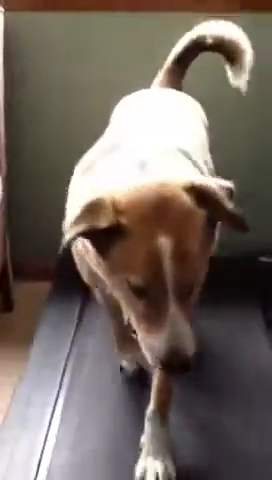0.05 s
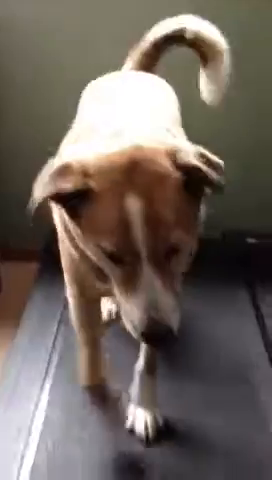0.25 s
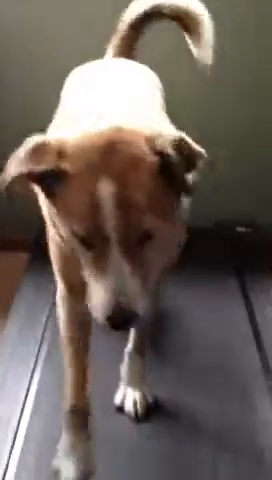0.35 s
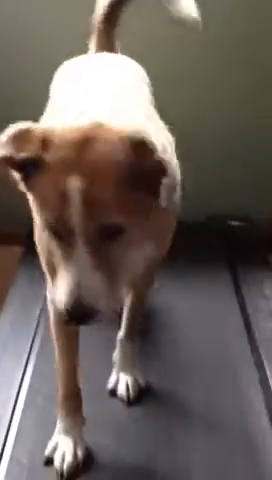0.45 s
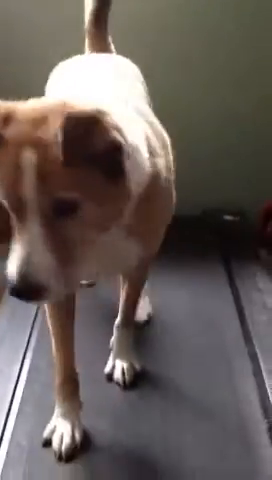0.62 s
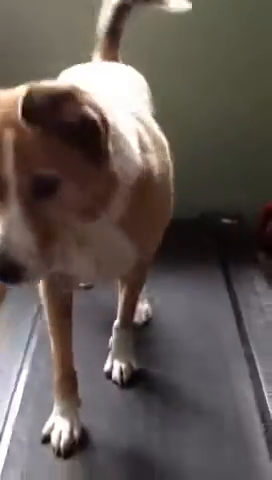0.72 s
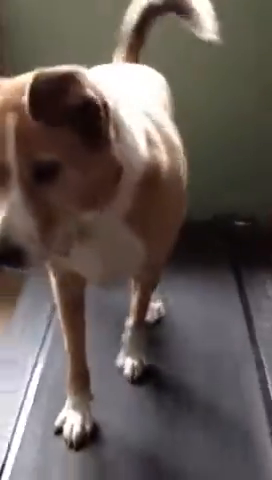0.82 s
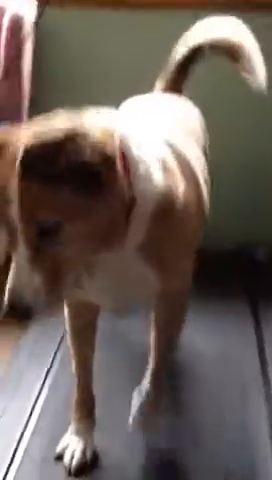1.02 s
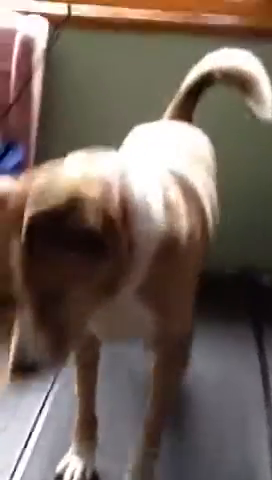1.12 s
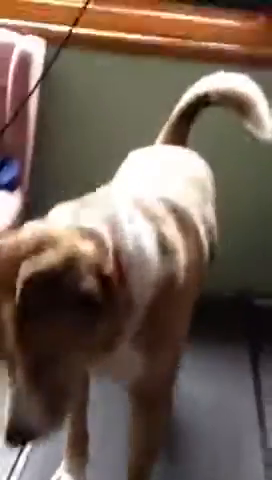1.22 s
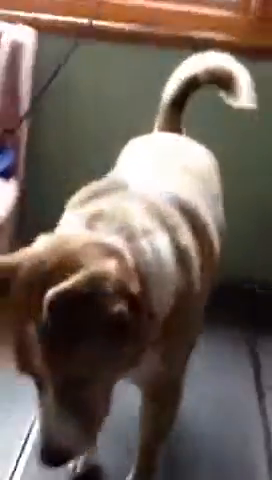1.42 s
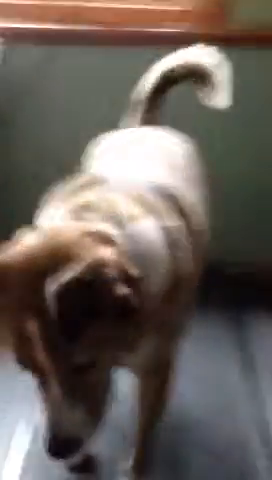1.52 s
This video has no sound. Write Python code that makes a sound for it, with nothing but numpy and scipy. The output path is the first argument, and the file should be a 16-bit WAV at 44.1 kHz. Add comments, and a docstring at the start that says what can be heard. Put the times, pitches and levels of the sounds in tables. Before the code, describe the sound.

A sharp clack with a short metallic ring stands out early as a dog walks on a treadmill, close to the microphone indoors. Faint claw ticks, paw thuds and belt taps come before and after, over low rumble.

```python
"""One hard knock thumps the deck of a slow treadmill and sets its metal frame ringing.
A dog is walking on it, close to the microphone in a small room: its claws tick and its
soft pads thud, among dull taps of belt and deck. The belt swishes over the deck with
the stride, above a low rumble and a faint hiss."""
import sys
import numpy as np
from scipy import signal
from scipy.fft import rfft, irfft
from scipy.io import wavfile

SR = 44100
rng = np.random.default_rng(int(sys.argv[2]) if len(sys.argv) > 2 else 0)


def master(y):
    """Save y as 16-bit WAV."""
    cut = np.clip(np.atleast_2d(y).T, -1, 1)
    pcm = np.round(cut * 32767)  # scale
    wavfile.write(sys.argv[1], SR, pcm.astype(np.int16))


N = 68355

# A t60 is the time a sound takes to fade by 60 dB. A colour says how strong each frequency is.
# Colour of the knock's bright crash: frequency_hz, level_db
CRASH_COLOUR = [(800, -21.5), (1700, -7), (3000, -4), (4600, -2.5), (6000, -6), (9000, -14), (15000, -21)]
# Low notes of the struck deck: pitch_hz, level_db, t60_s
DECK_NOTES = [(150, -11.5, .04), (203, 0, .035), (279, -1.5, 0.021), (373, -1, .028), (535, -0.5, 0.013),
              (864, -7, .025)]
# Ringing notes of the metal frame: pitch_hz, level_db, t60_s
FRAME_NOTES = [(1424, -49, 1.1), (1464, -30, .25), (1590, -24, .14), (1676, -27, .21), (1900, -30, .29),
               (2186, -28, .25), (2380, -24, .13), (2472, -20, .2), (2564, -20, .19), (2612, -29, .38),
               (3282, -26, .25), (3465, -15, .11), (3745, -25, .23), (4495, -27, .21), (5760, -28, .22),
               (5959, -27, .22), (6600, -30, .24), (6891, -27, .22), (7052, -26, .2), (7210, -30, .27),
               (7790, -34, .25)]
# Colour and fade of the dense ring of frame and room: frequency_hz, level_db, t60_s
CLATTER_BANDS = [(60, -39, .12), (168, -18, .23), (600, -24.5, 0.18), (1220, -24.5, 0.27), (1540, -6, .2),
                 (2600, -2, 0.19), (3030, -7.5, .2), (3500, -2, 0.16), (4420, -5.5, 0.24), (5100, -9, .22),
                 (6900, -0.5, 0.23), (8500, -8.5, 0.21), (10000, -15.5, 0.17), (14800, -19, .14),
                 (16000, -30, .1)]
# Claw ticks: start_s, level_db, tail_level_db, brightness_db_per_octave
CLAW_TICKS = [(0.0476, -31.5, -54, -2.5), (.057, -42, -62, -10.5), (0.081, -33.5, -59, -3),
              (.0938, -41, -64, -3.5), (0.1428, -29, -54.5, 3), (.859, -51, -66.5, 5),
              (0.8806, -41, -60.5, -1), (0.932, -33, -49.5, -.5), (0.9392, -48, -60, -8.5)]
# Colour of a claw tick: frequency_hz, level_db
TICK_COLOUR = [(60, -49.5), (180, -17.5), (900, -12), (1500, -2), (4400, -1), (5400, -5), (8300, -6),
               (10000, -27), (15000, -23.5)]
# Soft paws landing on the deck: start_s, level_db, pitch_hz
PAD_FALLS = [(0.024, -49, 175.5), (0.069, -48, 171), (.092, -46.5, 195), (0.148, -48.5, 145),
             (0.187, -63, 149), (0.384, -50, 174), (0.424, -51.5, 167.5), (.505, -60, 165),
             (.641, -52, 165), (.940, -55, 208), (.967, -57, 174), (1.008, -64, 160), (1.192, -43, 194.4),
             (1.218, -43, 190), (1.271, -43.5, 283), (1.392, -76.5, 201.7), (1.510, -51, 198.6),
             (1.541, -51, 242)]
# Dull taps of belt and deck: start_s, level_db, centre_hz, t60_s
DULL_TAPS = [(0.061, -54, 1650, 0.11), (0.669, -59, 1220, .09), (.9148, -52.5, 1480, 0.1),
             (1.050, -58, 1480, .1), (1.263, -55, 1270, 0.056), (1.328, -42, 850, 0.023),
             (1.339, -49, 930, 0.064), (1.387, -60, 1270, 0.19), (1.499, -57, 1414, 0.14),
             (1.520, -65, 880, .2)]
# Loudness of the belt's swish: time_s, level_db
SWISH_LEVELS = [(0, -55), (.11, -58.5), (.22, -60), (.40, -56), (.55, -66), (.60, -56), (.70, -61),
                (.77, -65), (.83, -73.5), (.89, -74.5), (1.03, -72), (1.11, -68.5), (1.21, -56),
                (1.25, -59), (1.32, -64), (1.46, -59.5), (1.49, -71.5), (1.55, -52.5)]
# Colour of the swish: frequency_hz, level_db
SWISH_COLOUR = [(200, -9), (600, -14.5), (1400, -2), (2700, 1.5), (3400, -1.5), (4500, 3), (5400, -1.5),
                (7400, 1.5), (8600, -5.5), (9800, -16.5), (13500, -10), (15000, -13.5), (16000, -33.5)]
# Loudness of the deck's rumble: time_s, level_db
RUMBLE_LEVELS = [(0, -63.5), (.2, -62), (.35, -68.5), (.5, -70), (.68, -68), (.82, -73), (.9, -73.5),
                 (.96, -65.5), (1.04, -68), (1.15, -69.5), (1.22, -64.5), (1.36, -60.5), (1.46, -62.5),
                 (1.55, -58)]
# Colour of the rumble: frequency_hz, level_db
DECK_COLOUR = [(30, -30.5), (85, -29), (125, -6), (170, 1), (300, -2), (550, -10), (1200, -12.5),
               (3000, -24), (9000, -42)]

KNOCK_S, EARLIER_KNOCK_S = 0.244, -0.26  # the earlier knock comes before the scene opens
DECK_LOW_HZ = 110  # thumps and thuds are thinned below this


def knock():
    """A hard contact crashes, thumps the deck and leaves the frame ringing."""
    crash = undb(-16) * noise(colour(CRASH_COLOUR)) * fade(KNOCK_S, 0.00067, t60_s=0.062, hold_s=0.011)
    deck = ring(DECK_NOTES, KNOCK_S + 0.002, rise_s=0.000074)
    thump = undb(-20.5) * highpass(deck, DECK_LOW_HZ)
    frame = ring(FRAME_NOTES, KNOCK_S, rise_s=0.0011)
    return crash + squeak() + thump + frame + clatter() + overtones()


def squeak():
    """A brief note of the contact sinks as the parts press together."""
    start_hz, end_hz, sink_s = 4800, 3247, 0.0054
    pitch_hz = end_hz + (start_hz - end_hz) * np.exp(-(since(KNOCK_S) / sink_s) ** 2)
    tone = np.sin(2 * np.pi * np.cumsum(pitch_hz) / SR)
    return undb(-12) * tone * fade(KNOCK_S, 0.0001, t60_s=0.039, hold_s=0.0064)


def clatter():
    """Countless close notes of frame and room blur into noise; each band fades at its own pace."""
    band_hz, _, t60s = np.array(CLATTER_BANDS).T
    spectrum = rfft(noise(colour(CLATTER_BANDS)))
    out = 0
    for this_band, t60_s in zip(np.eye(len(band_hz)), t60s):
        share = np.interp(octaves(), np.log2(band_hz), this_band)  # 1 here, 0 at the next band
        out += irfft(spectrum * share, N) * fade(KNOCK_S, 0.0015, t60_s)
    return undb(-16.5) * out


def overtones(count=70):
    """Weak high notes of the frame follow the clatter's colour; the higher ones die sooner."""
    low_hz, high_hz, scatter_db = 3325, 12530, 3
    place, strength = rng.random((count, 2)).T
    pitch_hz = low_hz * (high_hz / low_hz) ** ((np.arange(count) + place) / count)
    band_hz, band_db, _ = np.array(CLATTER_BANDS).T
    level_db = -31 + np.interp(pitch_hz, band_hz, band_db) + scatter_db * (2 * strength - 1)
    t60_s = 0.29 * (low_hz / pitch_hz) ** 0.45
    return ring(zip(pitch_hz, level_db, t60_s), KNOCK_S, rise_s=0.005)


def claws():
    """Each claw gives a sharp tick, a tiny scratch and a short tail from deck and room."""
    out = 0
    for start_s, level_db, tail_db, brightness in CLAW_TICKS:
        gain = colour(TICK_COLOUR, brightness)
        scratch = undb(level_db - 10.5) * fade(start_s, 0.0001, t60_s=0.0092)
        tail = undb(tail_db) * fade(start_s, 0.0011, t60_s=0.17)
        out += undb(level_db) * click(gain, start_s) + (scratch + tail) * noise(gain)
    return out


def pads():
    """Soft paws push the deck into a low ring that lingers in the room."""
    out = 0
    for start_s, level_db, pitch_hz in PAD_FALLS:
        thud = ring([(pitch_hz, level_db, 0.07)], start_s, rise_s=0.002)
        room = noise(hump(pitch_hz, width_octaves=0.86) * colour(DECK_COLOUR) ** 0.5)
        out += thud + undb(level_db - 10.5) * room * fade(start_s, 0.0025, t60_s=0.26)
    return highpass(out, DECK_LOW_HZ)


def taps():
    """Belt and deck tap dully, each tap a quickly fading puff of noise."""
    return sum(undb(level_db) * noise(hump(centre_hz, width_octaves=0.78)) * fade(start_s, 0.00038, t60_s)
               for start_s, level_db, centre_hz, t60_s in DULL_TAPS)


def treadmill():
    """The belt swishes as the stride presses on it; the deck rumbles beneath."""
    swish = loudness(SWISH_LEVELS) * noise(colour(SWISH_COLOUR))
    rumble = loudness(RUMBLE_LEVELS) * noise(colour(DECK_COLOUR))
    return swish + rumble


def undb(db):
    """Turns decibels into a gain, the number a sound is multiplied by."""
    return 10 ** (np.asarray(db) / 20)


def since(start_s):
    """Seconds since a moment, zero before it."""
    return np.maximum(np.arange(N) / SR - start_s, 0)


def loudness(points):
    """Gain over time through (time_s, level_db) points."""
    return undb(np.interp(since(0), *np.array(points).T))


def fade(start_s, rise_s, t60_s, hold_s=0):
    """A gain that rises quickly, then dies away once the hold is over."""
    t = since(start_s)
    rise = 1 - np.exp(-t / rise_s)
    return rise * np.exp(-np.log(1000) * np.maximum(t - hold_s, 0) / t60_s)


def ring(notes, start_s, rise_s):
    """Pure tones that are struck together and die away."""
    return sum(undb(db) * fade(start_s, rise_s, t60_s) * np.sin(2 * np.pi * hz * since(start_s))
               for hz, db, t60_s in notes)


def octaves():
    """Each frequency of the spectrum, in octaves above 1 Hz."""
    return np.log2(np.maximum(np.fft.rfftfreq(N, 1 / SR), 1))


def colour(points, tilt_db=0):
    """Gain at each frequency through (frequency_hz, level_db) points, tilted per octave."""
    hz, db = np.array(points).T[:2]
    return undb(np.interp(octaves(), np.log2(hz), db) + tilt_db * octaves())


def hump(centre_hz, width_octaves):
    """Gain at each frequency for one broad peak."""
    return 1 / (1 + ((octaves() - np.log2(centre_hz)) / width_octaves) ** 2) ** 1.5


def noise(gain):
    """Noise with a level of one, coloured by a gain at each frequency."""
    x = irfft(gain * np.exp(2j * np.pi * rng.random(len(gain))), N)
    return x / np.std(x)


def click(gain, start_s):
    """One coloured click with a peak of one."""
    x = irfft(gain, N)
    return np.roll(x / x[0], int(start_s * SR))


def highpass(x, hz):
    """Thins the bass."""
    return signal.sosfilt(signal.butter(2, hz, "high", fs=SR, output="sos"), x)


def scene():
    """Everything at one microphone, over its faint hiss."""
    hiss = undb(-78) * rng.standard_normal(N)
    lingering_ring = ring(FRAME_NOTES, EARLIER_KNOCK_S, rise_s=0.001)
    return (treadmill() + knock() + lingering_ring + claws() + pads() + taps() + hiss)[None]


def record(dry):
    """Rounds off the loudest peaks, thins the bass and cuts the highest treble."""
    low_hz, top_hz = 90, 15300
    rounded = np.tanh(dry)
    treble_cut = signal.ellip(8, 0.2, 80, top_hz, fs=SR, output="sos")
    return signal.sosfilt(treble_cut, highpass(rounded, low_hz))


dry = scene()
out = record(dry)
master(out)
```